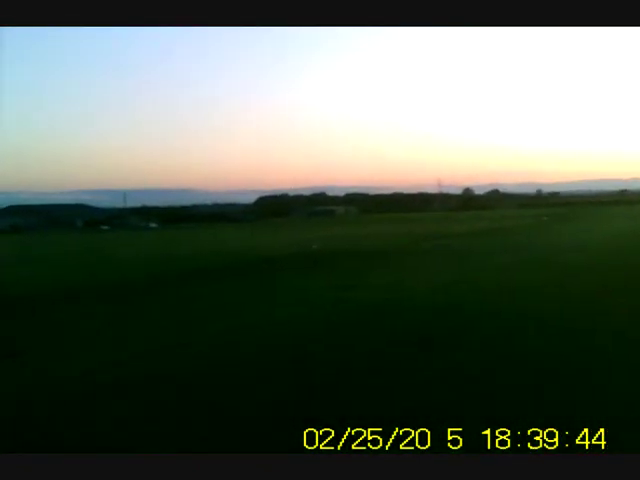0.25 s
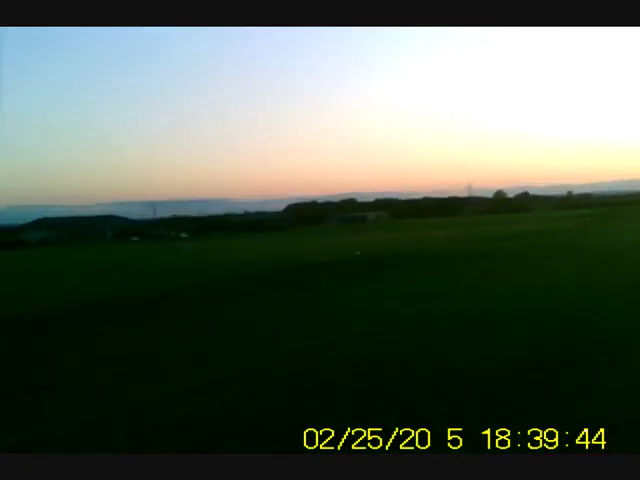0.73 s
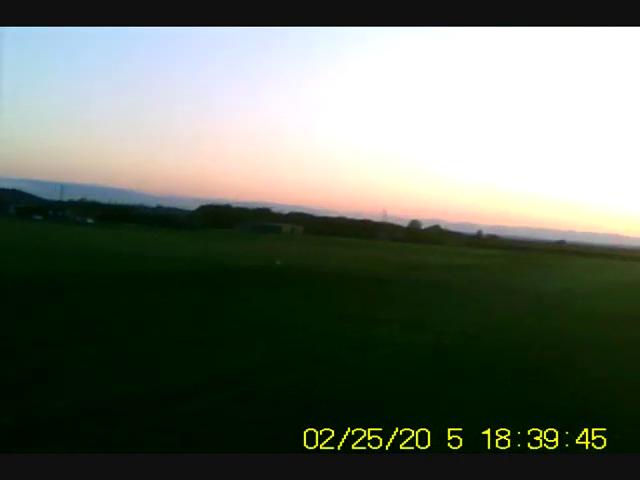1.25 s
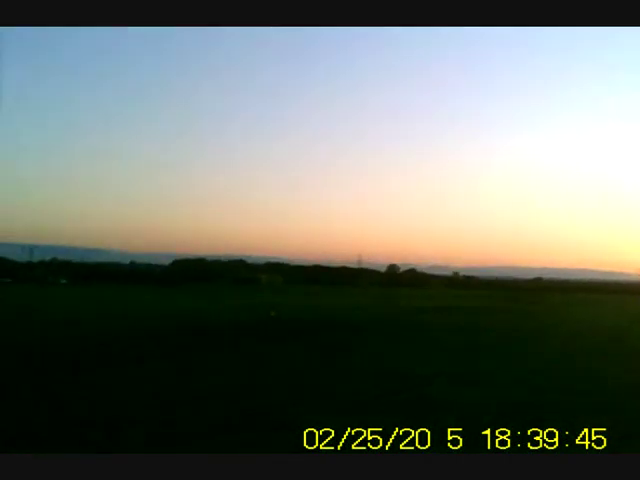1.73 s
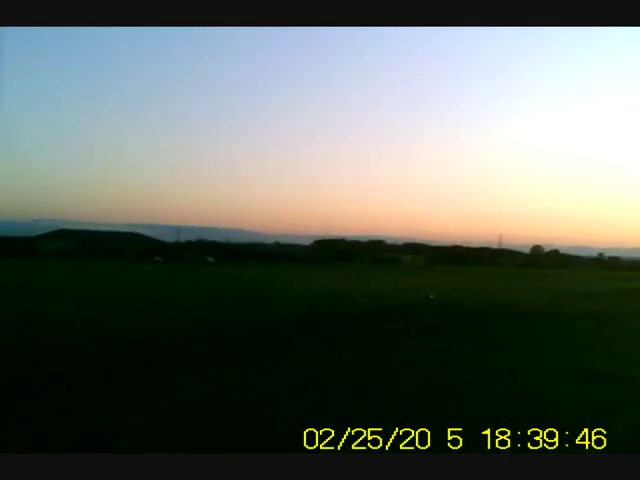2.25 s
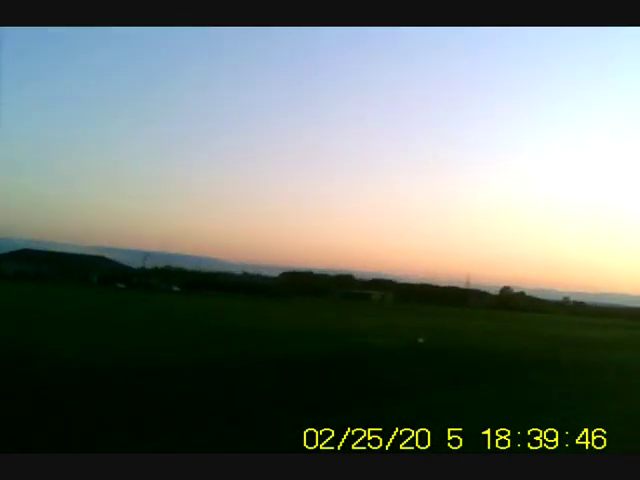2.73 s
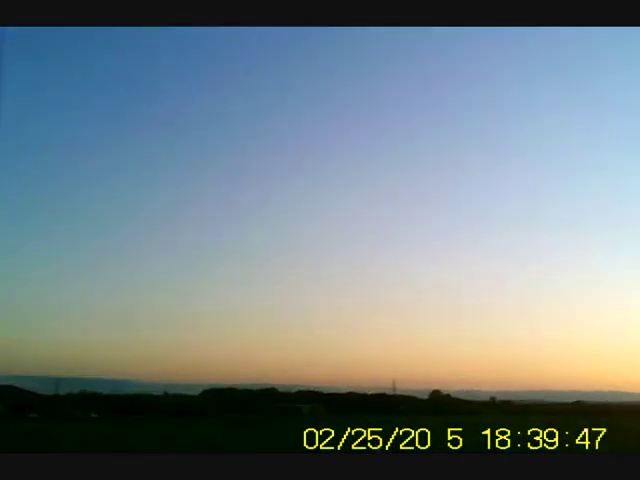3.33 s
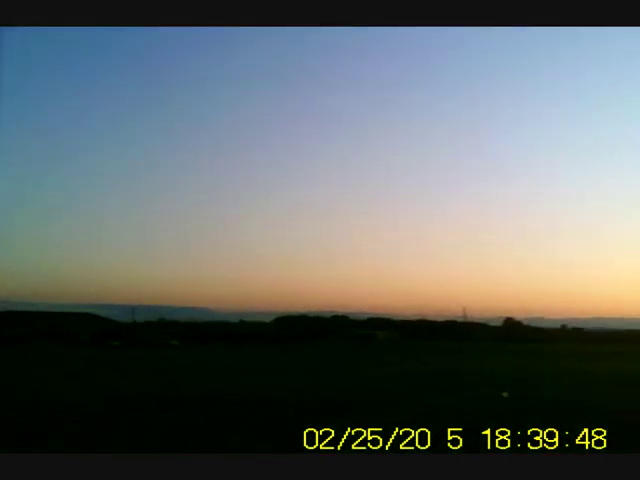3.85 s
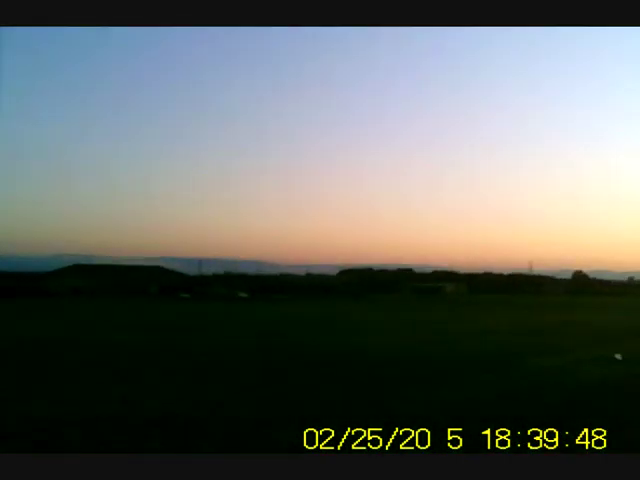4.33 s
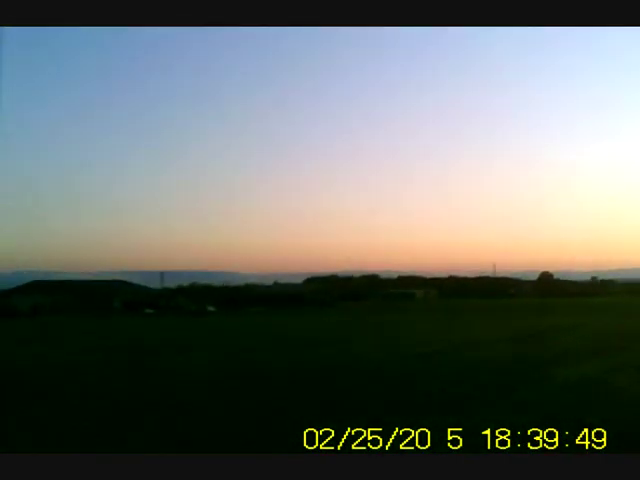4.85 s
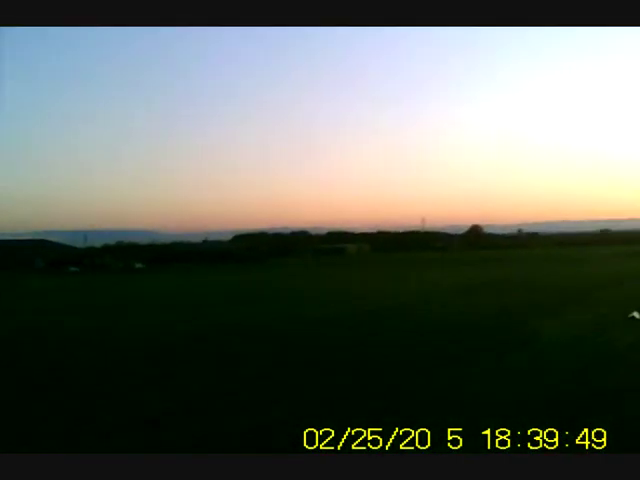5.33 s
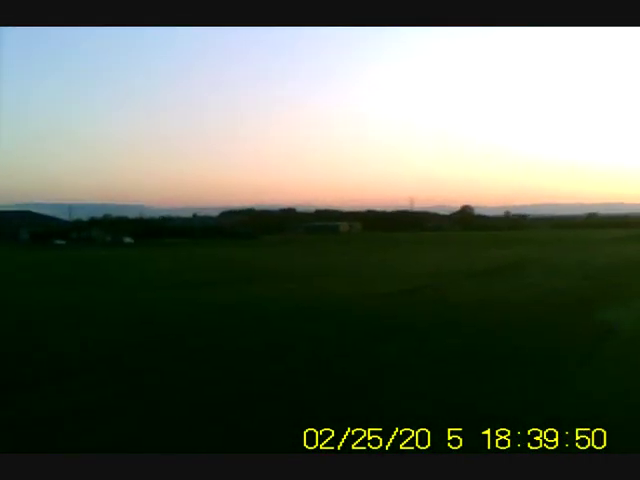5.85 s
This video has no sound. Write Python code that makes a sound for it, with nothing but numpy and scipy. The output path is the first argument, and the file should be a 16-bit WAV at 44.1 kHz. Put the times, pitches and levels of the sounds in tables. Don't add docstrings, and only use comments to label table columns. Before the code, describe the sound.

A paramotor in flight, heard from just in front of its propeller, fills all six seconds without pause. Blade passes, about seventy-five a second, merge into a low, raw buzz of air pushes and suction snaps, with a hard metallic edge from ticking cage spokes. The single-cylinder two-stroke beats unevenly against it, while frame and silencer ring. Pitch jumps briefly at 0.3 s, dips, then climbs to its highest and fiercest around 1.5-1.7 s. It eases at 2 s, then drops sharply near 3 s, running lower and softer until about 3.7 s. It firms slightly by 4 s and rises again around 5 s, wavering up to the end. Broad turbulence rushes throughout; low wind thumps come near 0.3, 1, 2.3, 4.4 and 4.9 s. The microphone is dull and close, with clipped peaks, thin breathing hiss, faint electronic whine and no echo.

```python
import sys
import numpy as np
from scipy import signal
from scipy.fft import rfft, irfft
from scipy.io import wavfile
from scipy.ndimage import uniform_filter1d

SR = 44100
rng = np.random.default_rng(int(sys.argv[2]) if len(sys.argv) > 2 else 0)


def generate_wav(signal):
    frames = np.transpose(np.atleast_2d(signal))
    scaled = np.clip(frames, -1, 1) * 32767
    pcm = np.round(scaled).astype(np.int16)
    wavfile.write(sys.argv[1], SR, pcm)


def ratio_of_db(decibels):
    return 10 ** (np.asarray(decibels, float) / 20)


N = 269010
T = np.arange(N) / SR
CRUISE_HZ = 75


def unit(x):
    return x / np.sqrt(np.mean(x ** 2))


def coloured(points):
    hz, db = np.transpose(points)
    bins = np.arange(N // 2 + 1) * SR / N + 1
    gain = ratio_of_db(np.interp(np.log(bins), np.log(hz), db))
    return unit(irfft(rfft(rng.standard_normal(N)) * gain, N))


def walk(rate):
    hold = int(SR / rate)
    steps = np.repeat(rng.standard_normal(N // hold + 1), hold)
    return unit(uniform_filter1d(uniform_filter1d(steps, hold), hold)[:N])


def ring(x, hz, width):
    return signal.lfilter(*signal.iirpeak(hz, hz / width, SR), x)


def response(f, hz, width):
    return 1 / np.hypot(1, (f / hz - hz / f) * hz / width)


def cusp(turns, place, rise, fall):
    d = (turns - place + 0.2522) % 1 - .25
    lobe = np.exp(-np.abs(d) / np.where(d < 0, rise, fall))
    tail = (d < 0) * np.exp(-(d + 1) / fall)
    return lobe + tail


def speed():
    # (time [s], blade passes [Hz])
    passes = [(0, 74.6), (.275, 78.5), (.341, 69.55), (.553, 75), (1.494, 84.4), (1.737, 83.55),
              (2.085, 76.45), (2.465, 76.35), (2.848, 73.1), (2.984, 64.3), (3.185, 66.75), (3.633, 64),
              (3.84, 68.85), (4.835, 70.35), (5.152, 76.9), (5.723, 74.35), (5.917, 78.45), (6.1, 77)]
    inertia_s = .09
    return uniform_filter1d(np.interp(T, *np.transpose(passes)), size=int(inertia_s * SR), mode="nearest")


def layer_db(hz, cruise_db, per_hz, per_hz2, per_bite_db):
    # (time [s], bite [dB])
    bite = [(0, -2), (.3, 1), (.9, 0.23), (1.6, -0.4), (2.1, 0), (2.4, -1.9), (2.85, -2.5), (3.3, -1.4),
            (3.8, 0.3), (4.2, 1.1), (4.75, 0.3), (5.1, -1), (5.6, 0.35), (6.1, -0.6)]
    over = hz - CRUISE_HZ
    return cruise_db + per_hz * over + per_hz2 * over ** 2 + per_bite_db * np.interp(T, *np.transpose(bite))


def camera_hiss():
    # (frequency [Hz], density [dB per Hz])
    hiss_spectrum = [(2500, -10), (4000, 0.5), (5000, -4.5), (5900, 0.5), (6600, -4.5), (7300, -12.5),
                     (8000, -6), (8650, -1.5), (9300, -8), (10200, -15), (10700, -25)]
    level_db, swing_db, swing_period_s, swing_peak_s = -51.5, .85, 3.07, 2.94
    over = speed() - CRUISE_HZ
    swing = swing_db * np.cos(2 * np.pi * (T - swing_peak_s) / swing_period_s)
    slowing = uniform_filter1d(np.minimum(np.gradient(over) * SR, 0), size=SR // 5)
    breathing = level_db + swing + .22 * over + .027 * over ** 2 + .04 * slowing
    return coloured(hiss_spectrum) * ratio_of_db(breathing + .6 * walk(22))


def camera_whine():
    # (frequency [Hz], rms level [dB])
    whine_tones = [(3894, -74), (5760, -76), (7402, -80), (7520, -79), (7790, -77), (8737, -78),
                   (9600, -84), (10637, -87)]
    return sum(ratio_of_db(db + 3) * np.sin(2 * np.pi * hz * T) for hz, db in whine_tones)


def wind():
    # (time [s], level [dB], frequency [Hz])
    thumps = [
        (0.274, -22.5, 37),
        (0.969, -11, 12.3),
        (1.808, -36.5, 7.8),
        (2.326, -25.5, 24),
        (4.439, -28, 50),
        (4.866, -26, 30),
        (5.589, -37, 48),
        (5.802, -33.5, 29),
    ]
    buffeting = [(3, 10.5), (12, -4.5), (30, -9.5), (45, -19.5), (120, -38), (400, -92.0)]  # (Hz, dB)
    out = coloured(buffeting) * ratio_of_db(-29.5 + 5.8 * walk(3.875))
    for s, db, hz in thumps:
        push = np.exp(-.5 * ((T - s - .03) / 0.0074) ** 2)
        out += ratio_of_db(db) * push * np.sin(2 * np.pi * hz * (T - s))
    return out


def air(turns, rush_db):
    # (frequency [Hz], density [dB per Hz])
    rush_spectrum = [(50, -2.5), (100, -2.5), (170, 0.5), (260, 0.5), (340, -4), (480, -9), (800, -11),
                     (1100, -15), (1800, -16), (2300, -19), (3000, -29.5), (4000, -32.5), (6000, -57.5)]
    flare = 3.6 + 0.4 * cusp(turns, 0.07, 0.015, 0.025) + 0.35 * cusp(turns, -0.0025, 0.096, 0.037)
    rush = coloured(rush_spectrum) * unit(flare) * ratio_of_db(rush_db + 12.5 + 0.76 * walk(30))
    frame = unit(ring(ring(rng.standard_normal(N), 250, 50), 250, 50))
    return rush + frame * ratio_of_db(-36 + 1.5 * walk(12))


def engine(turns, hz):
    # (multiple of the firing rate [-], level [dB])
    firing_tones = [(1, -22), (2, -25.5), (3, -45.5), (4, -49.5), (5, -52), (7, -42.5), (8, -45), (9, -52),
                    (10, -50)]
    fins = {7: (978, 70), 8: (1050, 150)}
    # (distance [blade passes], level [dB])
    sidebands = [(-.5, -29), (-1, -30), (1, -33)]
    # (distance [blade passes], level [dB])
    chops = [(1, -40), (2, -44.5)]
    silencer, frame = (150, 22), (251, 36)

    slip = .07735 + .00051 * (hz - CRUISE_HZ) + .00097 * (T - N / SR / 2)
    stretch = .0152 * uniform_filter1d(hz - hz[0], size=SR // 5, mode="nearest")
    beat_start = -.595
    firings = 2 * turns - beat_start - np.cumsum(slip * hz) / SR - stretch
    firing_hz = np.gradient(firings) * SR

    gains = {1: response(firing_hz, *silencer) ** 2, 2: response(2 * firing_hz, *frame)}
    gains.update({k: response(k * firing_hz, *fin) for k, fin in fins.items()})
    out = sum(ratio_of_db(db) * gains.get(k, 1) * np.cos(2 * np.pi * k * firings) for k, db in firing_tones)
    for side, db in sidebands:
        gain = response(2 * firing_hz + side * hz, *frame) ** (2 if side < 0 else 1)
        out += ratio_of_db(db) * gain * np.cos(2 * np.pi * (2 * firings + side * turns))
    for side, db in chops:
        out += ratio_of_db(db) * np.cos(2 * np.pi * (2 * firings + side * turns))
    return np.sqrt(2) * ratio_of_db(0.42 * walk(90)) * out


def cage_ticks(centred, load):
    spokes = [(-.343, .007, -.03), (-.224, .008, -.06), (-.2, 0.0046, 0.055), (-.028, 0.0056, -0.11),
              (.001, 0.005, 0.046), (0.113, 0.029, 0.14), (0.26, 0.0078, -0.017), (.37, 0.011, 0.06),
              (0.432, 0.035, .038)]
    sway = 1 + .02 * walk(2.5)
    ticks = 0
    for place, width, size in spokes:
        distance = (centred - place * sway) / (width * load ** -.3)
        ticks = ticks + size * np.exp(-.5 * distance ** 2)
    return ticks * load ** .4 + .3 * load ** -1.9 * ring(ticks, 630, 75)


def propeller(turns, load_db, snap_db, pull_db, swirl_db):
    chance = rng.standard_normal((600, 2))[np.floor(turns + .5).astype(int)].T
    late = rng.standard_normal(600)[np.floor(turns + .598).astype(int)]
    load, snap = ratio_of_db(load_db + 18), ratio_of_db(snap_db + 22.5)
    centred = (turns + .5) % 1 - .5
    pair = 1 + 0.063 * np.cos(np.pi * turns + .7)
    hump_width = 0.058 * load ** -.4
    hump = np.exp(-.5 * ((centred + 0.001 * chance[0]) / hump_width) ** 2) * ratio_of_db(0.46 * chance[1])
    suction = cusp(turns + .0012 * walk(60), .155, .05, .2) * load ** .5 * ratio_of_db(pull_db)
    tip = cusp(turns + .001 * walk(80), 0.1536, 0.03, 0.031) * ratio_of_db(1.1 * late)
    ticks = cage_ticks(centred, load)
    wave = load * (0.59 * hump - 0.47 * suction) - 0.26 * snap * tip
    wave = pair * (wave + 1.26 * ticks * ratio_of_db(0.46 * walk(150)))
    wave = uniform_filter1d(wave + 0.055 * load ** -.8 * ring(wave, 650, 59), size=5)
    spin = np.exp(2j * np.pi * turns)
    lowest = uniform_filter1d(uniform_filter1d(wave / spin, size=SR // 25), size=SR // 25)
    swirl = ratio_of_db(swirl_db) * np.sqrt(2) * np.cos(2 * np.pi * turns + .6)
    return wave - uniform_filter1d(wave, size=SR // 12) - 2 * (lowest * spin).real + swirl


def scene():
    hz = speed()
    turns = np.cumsum(hz * (1 + .0006 * walk(30))) / SR
    load_db = layer_db(hz, -16.5, 0.2744, -0.0428, 0.43)
    snap_db = layer_db(hz, -23, 0.82, -0.0127, 3.5)
    pull_db = layer_db(hz, -0.068, -0.05, 0.049, -0.56)
    rush_db = layer_db(hz, -36, 0.26, -0.0073, -0.07)
    swirl_db = layer_db(hz, -22.5, 0.2, -0.0166, -0.7) + .5 * T
    blades = propeller(turns, load_db, snap_db, pull_db, swirl_db)
    mix = wind() + air(turns, rush_db) + engine(turns, hz) + blades
    return mix[None]


def band_limit(x):
    return signal.sosfilt(signal.butter(12, 15800, fs=SR, output="sos"), x)


def record(dry):
    offset, top_hz, knee, headroom = -.036, 10750, .8, .228
    dull = signal.sosfilt(signal.butter(3, 3000, fs=SR, output="sos"), dry)
    x = dull + offset
    over = np.maximum(np.abs(x) - knee, 0)
    x = x - np.sign(x) * (over - headroom * np.tanh(over / headroom))
    x = x + camera_hiss() + camera_whine()
    x = signal.sosfilt(signal.ellip(10, .2, 60, top_hz, fs=SR, output="sos"), x)
    return band_limit(np.clip(x, -1, 1))


dry = scene()
out = record(dry)
generate_wav(out)
```